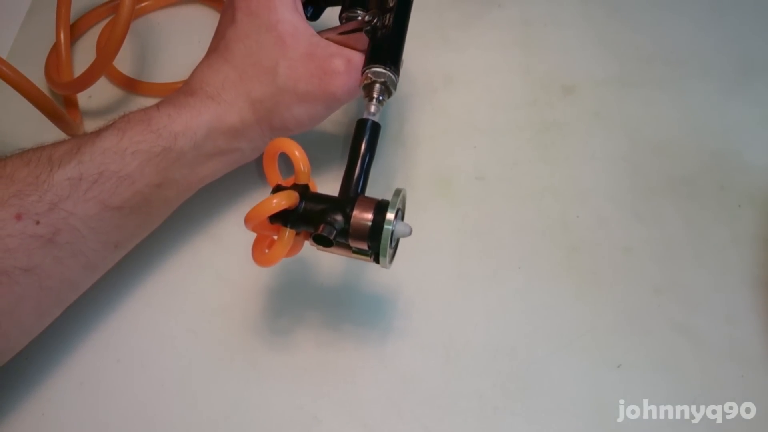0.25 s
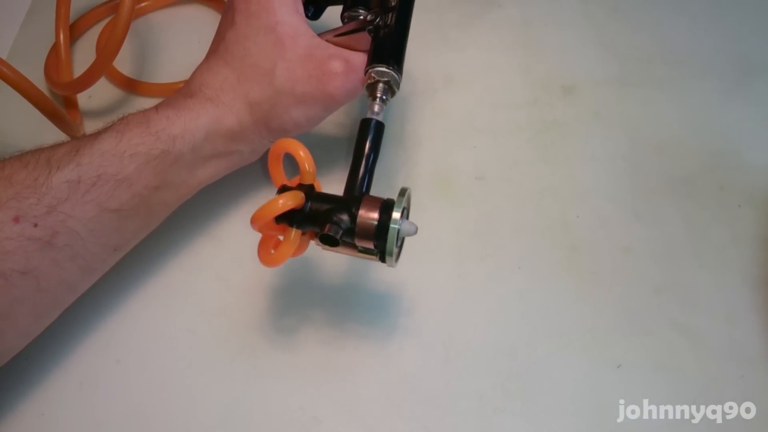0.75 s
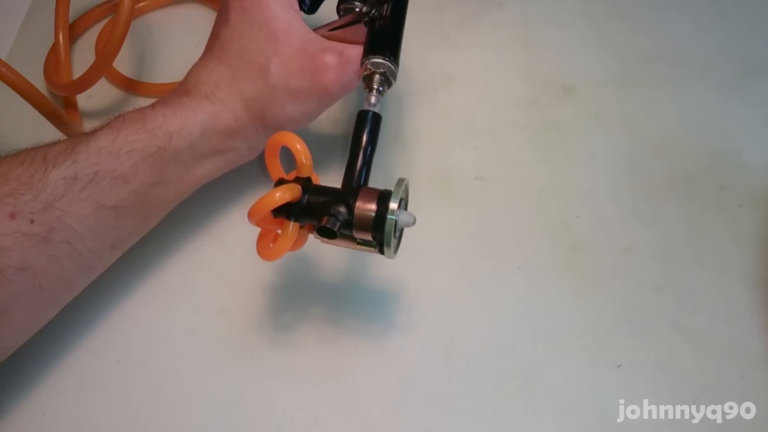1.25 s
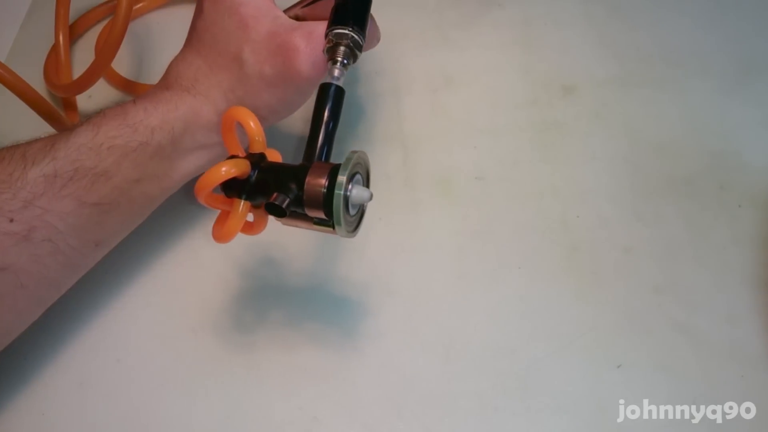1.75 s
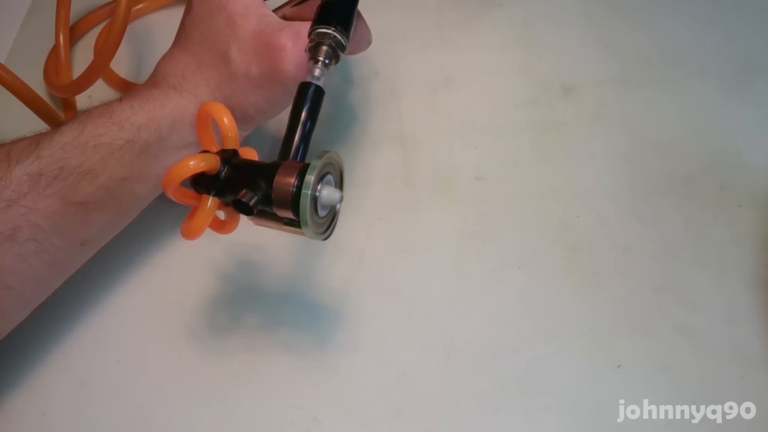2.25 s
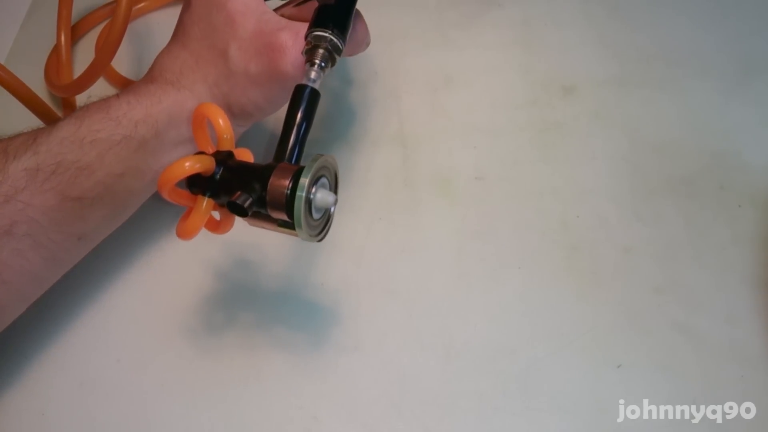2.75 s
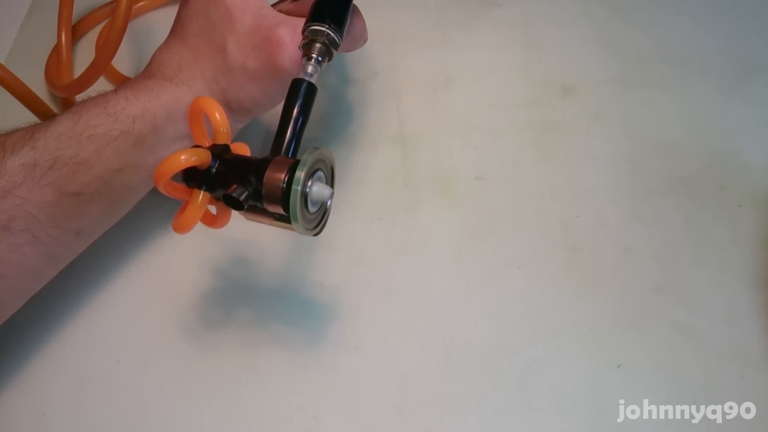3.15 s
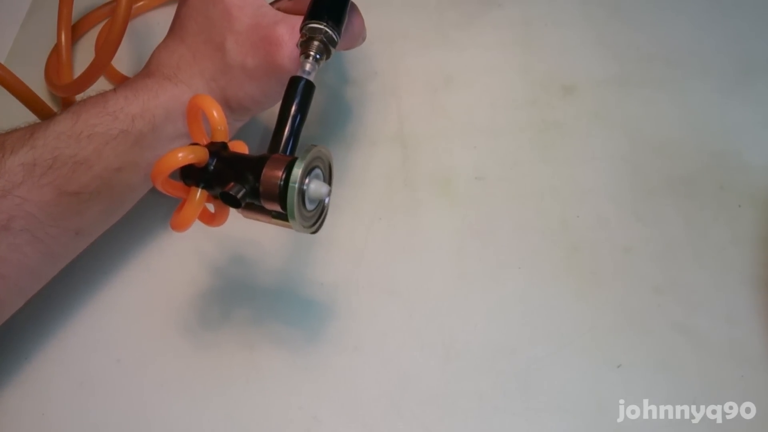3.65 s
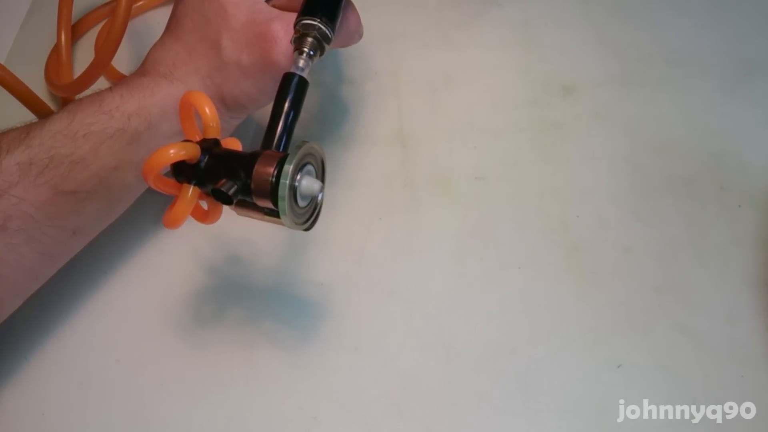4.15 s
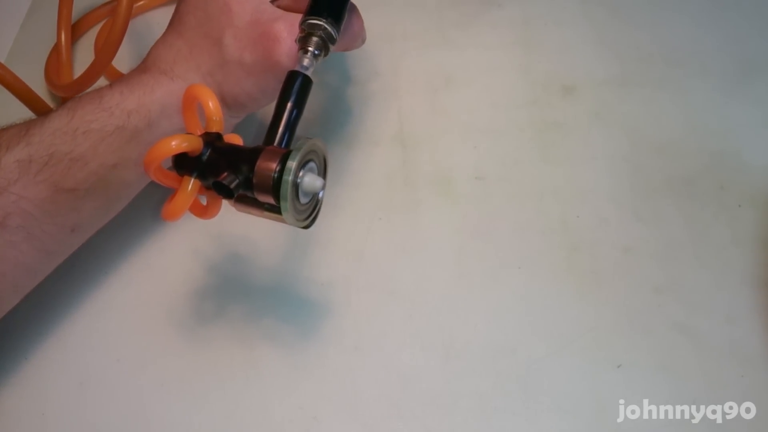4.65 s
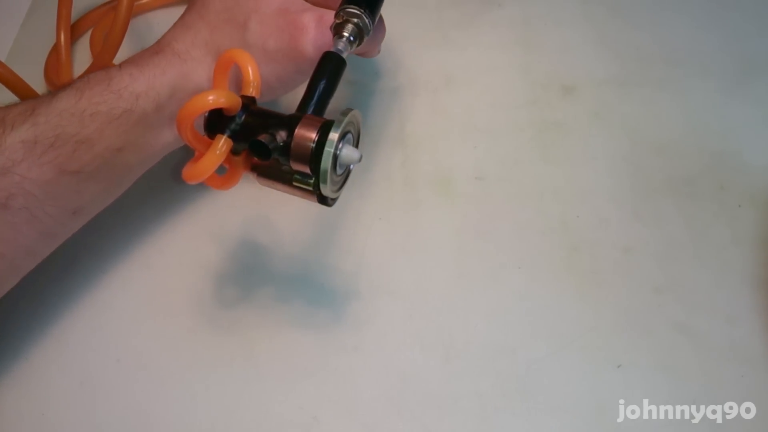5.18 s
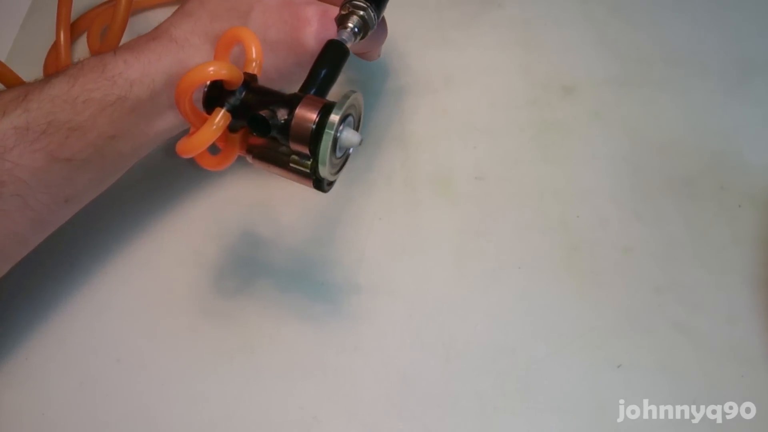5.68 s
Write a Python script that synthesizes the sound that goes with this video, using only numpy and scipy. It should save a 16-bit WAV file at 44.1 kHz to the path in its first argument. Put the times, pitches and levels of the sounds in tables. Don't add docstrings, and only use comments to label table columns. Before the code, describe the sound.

Loud compressed-air hiss and a buzzing rising whine cut off, leaving a falling rotor rattle, before the air returns and pitch climbs again.

```python
import sys
import numpy as np
from scipy import signal
from scipy.fft import rfft, irfft, next_fast_len
from scipy.io import wavfile
from scipy.ndimage import uniform_filter1d, map_coordinates

SR = 44100
rng = np.random.default_rng(int(sys.argv[2]) if len(sys.argv) > 2 else 0)


def output_pcm(signal):
    pcm = np.clip(np.atleast_2d(signal).T, -1, 1) * 32767
    wavfile.write(sys.argv[1], SR, np.round(pcm).astype(np.int16))


def magnitude_from_level(level_db):
    exponent = np.asarray(level_db, float) / 20
    return 10 ** exponent


N = 261072

# (time [s], speed [turns/s])
SPEED = [(0.0, 146.7), (0.2, 159.3), (0.5, 172.2), (0.72, 178.3), (0.85, 178.2), (0.98, 170.3), (1.4, 142),
         (2.0, 116), (2.4, 103.2), (2.57, 98.6), (2.7, 99.9), (3.45, 116), (3.6, 116.5), (4.05, 123.5),
         (4.5, 132.6), (4.95, 136.3), (5.6, 148.8), (5.8, 151)]
MEAN_SPEED, INERTIA_SAMPLES = 135, 3000

# (time [s], flow [dB], force on the whistling edge [dB])
FLOW = [(0.0, 1.5, 4), (0.11, 2, -13), (0.85, 1.5, -6), (0.96, -3, -7), (1.025, -22, -8), (2.54, -30, -12),
        (2.6, -14.5, 0), (2.64, -8, 9), (2.75, -2, 5), (2.91, -1, 7.5), (3.77, -1, 5.5), (4.02, 0.5, 9.5),
        (4.54, 0.3, 3), (4.9, -2, 4), (5.0, 1.2, 3), (5.39, 2, 5), (5.82, 1.3, 1), (5.92, -9, -10)]
VALVE_SHUT_S, VALVE_OPEN_S = 1.025, 2.57

# (order [per turn], level over the 2nd order [dB])
MINOR_ORDERS = [(3, -5.5), (4, -6.5), (6, -4), (7, -3), (11, -26)]
SHAFT_DB, SHAFT_GROWS, SHAFT_FOLLOWS = (-54, -51.5), (0.71, 1.02), 0.5
FRAME_HZ, FRAME_WIDTH_HZ, FRAME_DB = 312, 36, -59.5

VANES = 5
# level at the source [dB], dB per dB of flow, loss in coasting [dB]
VANE_DB, VANE_FOLLOWS = (-35, -32.5, -33, -34), (0.88, 1.14, 1.4, 0.6)
VANE_COAST_DB = (-11, -16, -1, -20)
VANE_FIRST_DB, FIRST_BURST_DB = (1, 3.5, 5, -2.5), 5.5
FIRST_FADES_S, FIRST_FADE_DB_PER_S = 0.904, 110
THIRD_FADES_S, THIRD_FADE_DB_PER_S = 5.58, 200

# (frequency [Hz], level [dB])
TUBES = [(100, -3), (500, -3), (800, -3), (1200, -7), (1700, 3.5), (2350, 2), (2750, -8.5), (3500, -12)]
# (centre [Hz], width [Hz], level [dB])
TUBE_RIDGES = [
    [(165, 18, 2.5), (730, 23, -2), (774, 34, 7), (829, 46, 9), (885, 62, -1.5), (1550, 50, -7.5),
     (1580, 30, 5), (1635, 30, -4.5), (1784, 24, 3.5), (2320, 48, 3.5), (2530, 220, 4.5), (2660, 110, -7.5)],
    [(137, 21, 8.5), (262, 69, 3.5), (606, 54, 5.5), (636, 8.7, -13.5), (672.5, 12, -5.5), (693, 16, 4),
     (746, 21, 3.5), (1060, 78, 4), (1226.5, 63, -6.5), (1410, 153, 5.5), (1804, 28, 5), (2086, 75, 5),
     (2370, 40, -11), (2365, 36, 5)],
]

# (frequency [Hz], density [dB per Hz])
EXHAUST = [(18, -50), (30, -38.5), (80, -32), (125, -39), (178, -23), (239, -24.5), (439, -11),
           (640, -20.5), (806, -11), (896, -17), (2070, 5.5), (3290, -5), (4500, -5.5), (5850, -8),
           (9900, -120)]
EXHAUST_DB, EXHAUST_FOLLOWS = -33, 0.56

# (frequency [Hz], density [dB per Hz])
JET_FIRST = [(1760, -34), (3000, -11.5), (3820, -23), (4390, -10), (5710, -12.5), (9020, -3), (9540, -2.5),
             (10900, -5.5), (11600, 4.5), (12200, 3.5), (12800, -7.5), (13800, -0.5), (15700, -6)]
# (centre [Hz], width [Hz], level [dB])
JET_FIRST_RIDGES = [(11900, 350, 0), (12420, 350, -6.5), (11150, 300, -3.5), (9600, 400, 0)]
# (frequency [Hz], density [dB per Hz])
JET_SECOND = [(1760, -34), (3000, -14.5), (3310, -15.5), (4010, -13), (4670, -11.5), (6750, -9), (7280, -7),
              (8960, -3.5), (10000, 0.5), (11300, -4), (13400, -6), (15700, -12.5)]
# (centre [Hz], width [Hz], level [dB])
JET_SECOND_RIDGES = [(7500, 380, 2), (10100, 600, 0.5), (10450, 280, -1), (12200, 180, -3.5),
                     (15500, 400, 3)]
JET_DB, JET_FOLLOWS = -19, 0.86
TOP_DB, TOP_FOLLOWS = -25, 1.2
JET_SHUT_S, JET_CLOSING_S = (0.965, 6.0), 0.1
WHISTLE_DB, WHISTLE_HZ, WHISTLE_WANDER_HZ = -24, (11750, 11390), 60.7

# (time [s], lag [ms])
TABLE_LAG = [
    (0.0, 0.67),
    (1.5, 0.69),
    (2.5, 0.71),
    (4.7, 0.753),
    (5.3, 0.846),
    (5.92, 0.87),
]
TABLE_ECHO, TABLE_LOW_HZ, TABLE_HIGH_HZ = 0.18, 2800, 6000

# (frequency [Hz], density [dB per Hz])
RUMBLE = [(12, -15), (20, 6.5), (49, -12.5), (140, -3), (191, -31), (254, -9.5), (490, -22), (734, -22),
          (809, -2.5), (1140, -20), (2000, -15), (2600, -36), (4400, -120)]
RUMBLE_DB = -60

# (frequency [Hz], density [dB per Hz])
BEARING = [(710, -32), (1200, -27.5), (1810, -26.5), (2240, -20.5), (2750, -18.5), (3790, -15), (4810, -14),
           (7080, -9.5), (7720, -6.5), (9070, -2), (10100, 1), (15700, -29.5)]
# (centre [Hz], width [Hz], level [dB])
BEARING_RIDGES = [
    [(4200, 1200, -2), (4650, 150, 2), (8000, 1200, 3), (10300, 500, 1), (11800, 1200, 2)],
    [(4650, 150, 3), (8200, 700, -3), (9080, 300, 5), (9600, 400, -4), (10250, 400, 2), (11300, 900, -2)],
]
# (time [s], peak [dB])
KNOCKS = [(1.0643, -16), (1.1208, -22), (1.2576, -6), (1.5014, -20), (1.6073, -15), (1.6148, -17),
          (1.7163, -5), (1.755, -20), (1.8044, -23), (1.8822, -20), (1.904, -2), (1.9895, -11),
          (2.0143, -2), (2.0503, -20), (2.0853, -8), (2.1195, -3), (2.19, -17), (2.222, -19), (2.268, -24),
          (2.391, -11), (2.402, -13), (2.4315, -18), (2.4784, -17), (2.5078, -11), (2.5978, -20),
          (1.091, -16), (1.265, -12), (1.31, -9)]
BEARING_DB, BEARING_GROWS = -27.5, 1.64
BEARING_SLOWEST = 105
BEARING_FAST, BEARING_SLOW = 150, 115
BEARING_SETTLE_DB, BEARING_SETTLE_S, BEARING_SETTLES_AT_S = 2, 0.03, 1.3

# (centre [Hz], width [Hz], level [dB])
HOUSING = [(3250, 190, 1), (4640, 130, -2.5), (7180, 140, 2), (8600, 1200, 0.5), (10350, 2300, 2.5),
           (13600, 600, 3.5), (15800, 1000, 12)]
# (frequency [Hz], left over right [dB])
SIDE_DB = [(60, 0.5), (110, 16), (200, 2), (700, 4), (1290, 9), (2380, 9), (4400, 12.5), (6500, 10),
           (8120, 14), (10300, 16.5), (11500, 6), (12100, 33), (12700, 8), (13400, 10)]
# (frequency [Hz], shared share [0-1])
LIKENESS = [(30, 0.2), (150, 0.9), (700, 0.36), (2000, 1), (3200, 0), (8000, 0.2), (15000, 0)]
RIGHT_LAG_S = 0.00018

# (frequency [Hz], level against neighbours [dB])
GATE_LEFT = [(300, -12), (600, -6.5), (1400, -5.5), (2400, -7), (3300, -3), (3800, -3), (4200, -4),
             (4700, -3), (5900, -5), (6800, -12), (13000, -11), (13700, -5.5), (16000, -5.5)]
# (frequency [Hz], level against neighbours [dB])
GATE_RIGHT = [(1000, -9), (2800, -5), (3300, -2.5), (5200, -1.5), (6700, -.5), (7400, -2), (9600, -1.5),
              (10400, -6), (11900, -9), (12250, 6), (13150, 4), (13450, -1.5), (16000, -1)]
# (frequency [Hz], margin lost per dB of quiet [dB])
GATE_QUIET = [(2400, .07), (3000, -.12), (6500, -.12), (8000, .07)]


def at_hz(points, hz):
    mid_hz, level = np.transpose(points)
    return np.interp(np.log(hz + 1), np.log(mid_hz), level)


def ridges_db(ridges, hz):
    return sum(db / (1 + (2 * (hz - mid_hz) / width) ** 2) for mid_hz, width, db in ridges)


def housing(points, ridges=()):
    return lambda hz: at_hz(points, hz) + ridges_db(HOUSING + list(ridges), hz)


def in_time(rows):
    s, *columns = np.transpose(rows)
    return np.array([np.interp(np.arange(N) / SR, s, column) for column in columns])


def drift(rate):
    r = np.exp(-40 * np.pi * rate / SR)
    slow = signal.lfilter([1], [1, -2 * r, r * r], rng.standard_normal(N // 20 + 4002))[4000:]
    return np.interp(np.arange(N) / 20, np.arange(len(slow)), slow / slow.std())


def valve():
    t = np.arange(N) / SR
    return uniform_filter1d(((t < VALVE_SHUT_S) | (t > VALVE_OPEN_S)) * 1., size=800)


def first_burst():
    return np.arange(N) / SR < (VALVE_SHUT_S + VALVE_OPEN_S) / 2


def to_ports(near, diffuse, colour_db, shift_db=0.0):
    size = next_fast_len(N)
    hz = np.arange(size // 2 + 1) * SR / size
    alike = np.clip(at_hz(LIKENESS, hz), 0, 1)
    left = rfft(near, size)
    lagged = left * np.exp(-2j * np.pi * hz * RIGHT_LAG_S)
    right = alike * lagged + np.sqrt(1 - alike ** 2) * rfft(diffuse, size)
    right = right * magnitude_from_level(shift_db - at_hz(SIDE_DB, hz))
    return irfft(np.array([left, right]) * magnitude_from_level(colour_db(hz)), size)[:, :N]


def hiss(colour_db, gate=1, far_gate=1, shift_db=0.0):
    near, diffuse = rng.standard_normal((2, N))
    out = to_ports(near * gate, diffuse * far_gate, colour_db, shift_db)
    return out / out.mean(axis=0).std()


def split(x, edge_hz):
    filters = [signal.butter(8, edge_hz, kind, fs=SR, output="sos") for kind in ("low", "high")]
    parts = [signal.sosfilt(sos, x) for sos in filters]
    return [part / part.mean(axis=0).std() for part in parts]


def tone_levels(speed):
    t = np.arange(N) / SR
    first = t < VALVE_SHUT_S
    flow_db = in_time(FLOW)[0]
    facing_db = flow_db + FIRST_BURST_DB * first
    faster_db = 20 * np.log10(speed / MEAN_SPEED)

    def tubes(hz):
        return at_hz(TUBES, hz) + np.where(first, *[ridges_db(ridges, hz) for ridges in TUBE_RIDGES])

    shaft = [db + SHAFT_GROWS[k] * faster_db + SHAFT_FOLLOWS * facing_db + tubes((k + 1) * speed)
             for k, db in enumerate(SHAFT_DB)]
    vane = np.array([db + VANE_FIRST_DB[k] * first + VANE_FOLLOWS[k] * flow_db + tubes(VANES * (k + 1) * speed)
                     for k, db in enumerate(VANE_DB)])
    vane[2] -= THIRD_FADE_DB_PER_S * np.maximum(t - THIRD_FADES_S, 0)
    vane[0] -= FIRST_FADE_DB_PER_S * np.maximum(t - FIRST_FADES_S, 0) * first
    return np.r_[shaft, vane]


def whine(turns, speed, levels):
    first, second, *vane = magnitude_from_level(levels) * np.sqrt(2)
    angle = 2 * np.pi * turns
    tones = first * np.sin(angle) + second * np.sin(2 * angle + 1)
    flowing = valve()
    for order, level_db in MINOR_ORDERS:
        height = second * magnitude_from_level(level_db + 2.64 * drift(6.0))
        tones += flowing * height * np.sin(order * angle + 3.1 * drift(1.02))
    hum = magnitude_from_level(FRAME_DB + 4 * drift(20)) / (1 + ((3 * speed - FRAME_HZ) / FRAME_WIDTH_HZ) ** 2)
    tones += hum * np.sin(3 * angle + 0.6 * drift(8))
    for k, height in enumerate(vane):
        driven = np.maximum(flowing, magnitude_from_level(VANE_COAST_DB[k])) * height * magnitude_from_level(1.53 * drift(6.3))
        tones += driven * np.sin(VANES * (k + 1) * angle + 0.37 * k * drift(14.3))
    lagged = np.interp(np.arange(N) - RIGHT_LAG_S * 1.15 * SR, np.arange(N), tones)
    right = signal.lfilter(*signal.iirnotch(680, 14, fs=SR), lagged)
    return np.array([tones, magnitude_from_level(-6.5) * signal.lfilter([0.3], [1, -0.7], right)])


def exhaust(turns, flow_db):
    puffs = 1 + 0.31 * np.cos(2 * np.pi * VANES * turns)
    level_db = EXHAUST_DB + EXHAUST_FOLLOWS * flow_db + 1.0 + 1.0 * drift(27)
    return magnitude_from_level(level_db) * hiss(lambda hz: at_hz(EXHAUST, hz), puffs, puffs)


def jet(flow_db, closing):
    early = split(hiss(housing(JET_FIRST, JET_FIRST_RIDGES)), edge_hz=12350)
    late = split(hiss(housing(JET_SECOND, JET_SECOND_RIDGES)), edge_hz=12370)
    body, top = np.where(first_burst(), early, late)
    gust_db = 0.5 * drift(7.9)
    body_db = JET_DB + JET_FOLLOWS * flow_db + 0.96 + gust_db
    top_db = TOP_DB + TOP_FOLLOWS * flow_db + gust_db + 0.32 * drift(3.6)
    return magnitude_from_level(body_db) * body + magnitude_from_level(top_db) * top * closing ** 1.2


def edge_whistle(flow_db, edge_db):
    low = signal.butter(2, 210, fs=SR, output="sos")
    slow = signal.sosfilt(low, rng.standard_normal((4, N)))
    slow = (slow[:2] + 1j * slow[2:]) / slow.std()
    slow[1] = 0.15 * slow[0] + 1.4 * slow[1]
    whistle_hz = np.where(first_burst(), *WHISTLE_HZ) + WHISTLE_WANDER_HZ * drift(3.0)
    carrier = np.exp(2j * np.pi * np.cumsum(whistle_hz) / SR)
    level_db = WHISTLE_DB + flow_db + edge_db - 8.5 + 1.06 * drift(7)
    return magnitude_from_level(level_db) * (slow * carrier).real * magnitude_from_level(np.array([[4], [-3]]))


def air(turns):
    flow_db, edge_db = in_time(FLOW)
    left_s = np.where(first_burst(), *JET_SHUT_S) - np.arange(N) / SR
    closing = np.clip(left_s / JET_CLOSING_S, 0, 1)
    nozzle = jet(flow_db, closing) + edge_whistle(flow_db, edge_db)
    return valve() * (exhaust(turns, flow_db) + nozzle * closing)


def table_echo(x):
    lag_ms, = in_time(TABLE_LAG)
    mid = signal.butter(1, [TABLE_LOW_HZ, TABLE_HIGH_HZ], "band", fs=SR, output="sos")
    band = signal.sosfiltfilt(mid, x)
    late = np.arange(N) - lag_ms * SR / 1000
    return x + TABLE_ECHO * np.array([map_coordinates(side, [late], order=3) for side in band])


def rumble():
    return magnitude_from_level(RUMBLE_DB + 0.5 * drift(5.3)) * hiss(lambda hz: at_hz(RUMBLE, hz), shift_db=0.5)


def bearings(turns, speed):
    contacts = np.flatnonzero(np.diff(np.floor(2 * turns + 0.1 * drift(150))) > 0)
    force_db = 4.1 * rng.standard_normal(len(contacts)) + 2.5 * drift(6)[contacts]
    taps = np.zeros(N)
    taps[contacts] = magnitude_from_level(np.clip(force_db, -30, 8))

    faster_db = 20 * np.log10(np.maximum(speed, BEARING_SLOWEST) / MEAN_SPEED)
    level_db = BEARING_DB + BEARING_GROWS * faster_db + 0.56 * drift(27)
    settled = (np.arange(N) / SR - BEARING_SETTLES_AT_S) / BEARING_SETTLE_S
    level_db += BEARING_SETTLE_DB / (1 + np.exp(settled))

    cracks = np.zeros(N)
    for s, peak_db in KNOCKS:
        cracks[round(s * SR)] = magnitude_from_level(peak_db)
    fade = np.exp(-1 / (0.001 * SR))
    hits = taps + 1.4 * cracks / magnitude_from_level(level_db + 21.5)
    ring = signal.lfilter([1 - fade], [1, -2 * fade, fade ** 2], hits) * 2.3
    smear = np.exp(-1 / (0.01 * SR))
    far = signal.lfilter([1 - smear], [1, -smear], ring)

    fast, slow = [hiss(housing(BEARING, ridges), 1.5 + ring, 1.62 + far, shift_db=-0.5)
                  for ridges in BEARING_RIDGES]
    share = np.clip((speed - BEARING_SLOW) / (BEARING_FAST - BEARING_SLOW), 0, 1)
    rolling = magnitude_from_level(level_db) * (np.sqrt(share) * fast + np.sqrt(1 - share) * slow)
    cracked = to_ports(cracks, cracks, lambda hz: 0.5 * at_hz(BEARING, hz), shift_db=-1.0)
    return rolling + magnitude_from_level(-15.0) * cracked * cracks.max() / np.abs(cracked).max() * 2


def scene():
    speed = uniform_filter1d(in_time(SPEED)[0], size=INERTIA_SAMPLES, mode="nearest")
    turns = np.cumsum(speed) / SR
    blown = whine(turns, speed, tone_levels(speed)) + table_echo(air(turns))
    let_go = np.clip((N - np.arange(N)) / SR / 0.07, 0.55, 1)
    return blown + rumble() + bearings(turns, speed) * let_go


def band_gate(x):
    shape = dict(window="cosine", nperseg=2048, noverlap=1024)
    bins = signal.stft(x, **shape)[2]
    band_bins = np.clip(np.arange(160) / 5 - 1, 4, 8)
    edges = np.unique(np.cumsum(band_bins).astype(int).clip(0, 1024))
    edges = np.r_[0, edges]
    widths = np.diff(np.r_[edges, 1025])
    power = np.add.reduceat(np.abs(bins) ** 2, edges, axis=1) / widths[:, None]
    level_db = 10 * np.log10(power + 1e-16)
    under_db = level_db - uniform_filter1d(level_db, size=15, axis=1)
    under_db += 2.8 * uniform_filter1d(rng.standard_normal(level_db.shape), size=2, axis=2)
    hz = (edges + widths / 2) * SR / 2048
    usual_db = np.median(level_db, axis=2, keepdims=True)
    under_db += at_hz(GATE_QUIET, hz)[:, None] * (level_db - usual_db)
    limit_db = np.array([at_hz(GATE_LEFT, hz), at_hz(GATE_RIGHT, hz)])[:, :, None]
    keep = np.repeat(under_db > limit_db, widths, axis=1)
    return signal.istft(bins * keep, **shape)[1][:, :N]


def band_limit(x):
    return signal.sosfilt(signal.butter(12, 15900, fs=SR, output="sos"), x)


def record(dry):
    top_cut = signal.ellip(8, 0.1, 40, 15830, fs=SR, output="sos")
    cut = signal.sosfiltfilt(top_cut, dry)
    flattened = np.clip(2.4 * np.tanh(cut / 2.4), -1.02, 1.02)
    mix = band_gate(flattened)
    return band_limit(mix)


dry = scene()
out = record(dry)
output_pcm(out)
```